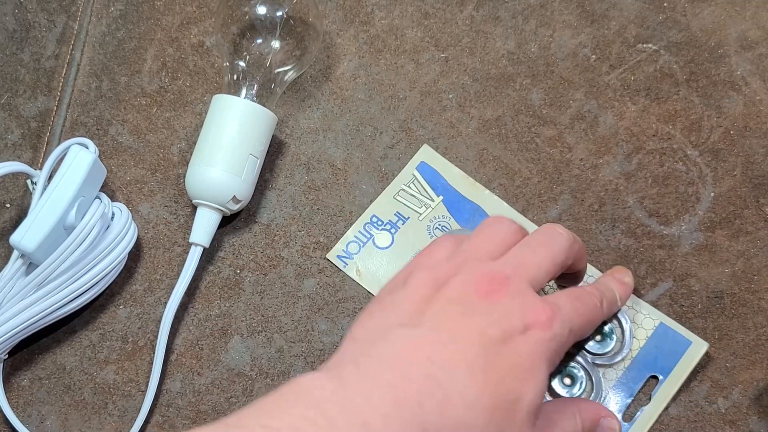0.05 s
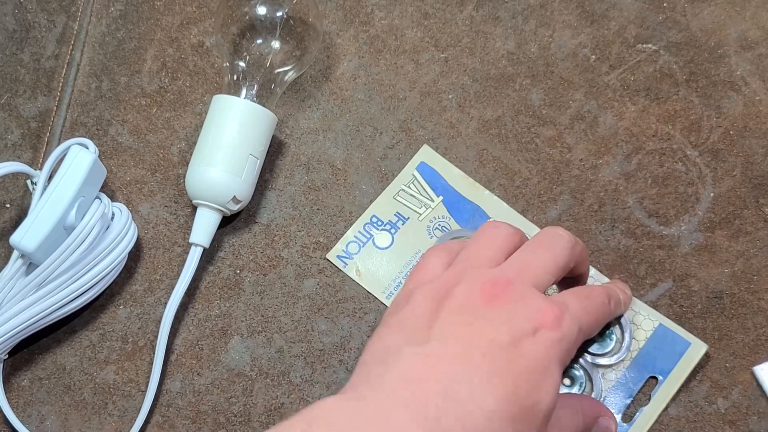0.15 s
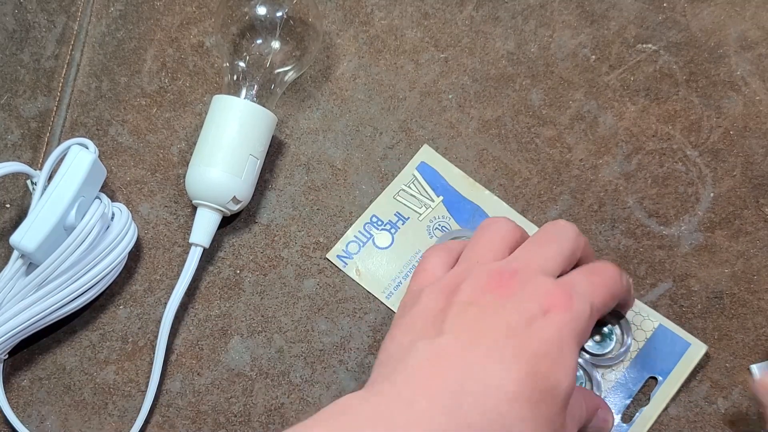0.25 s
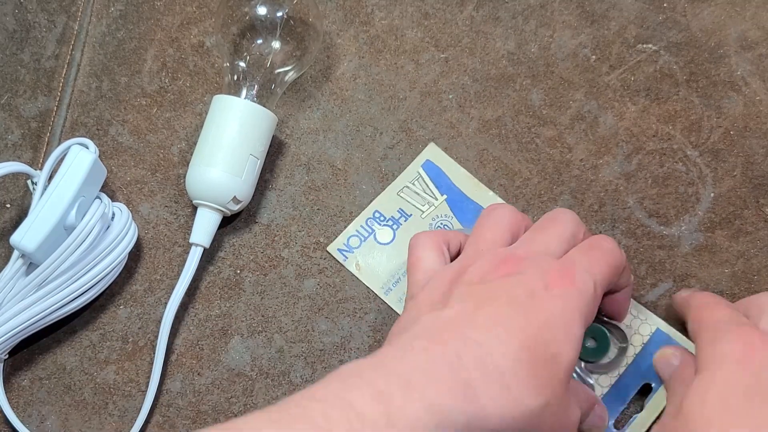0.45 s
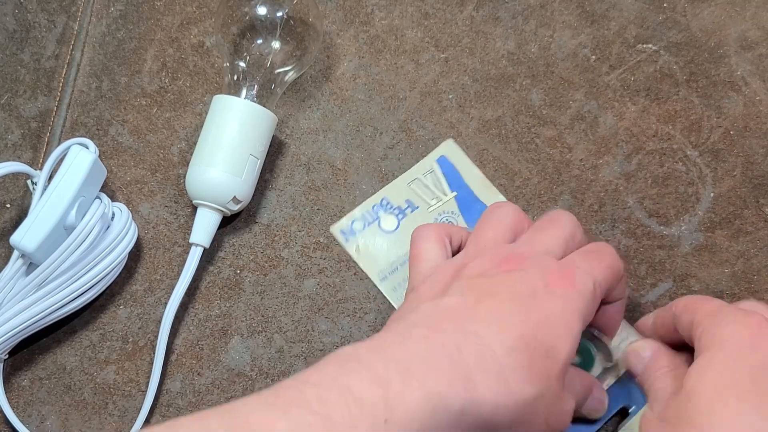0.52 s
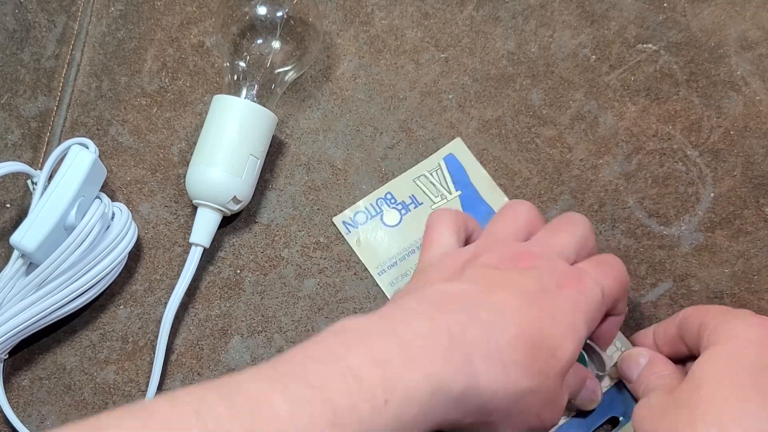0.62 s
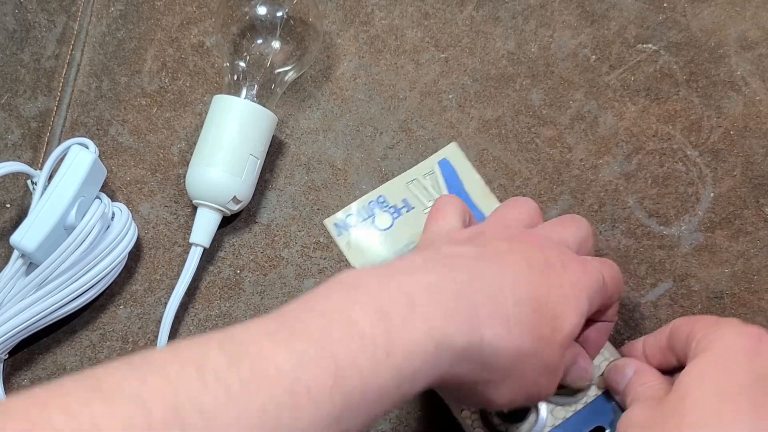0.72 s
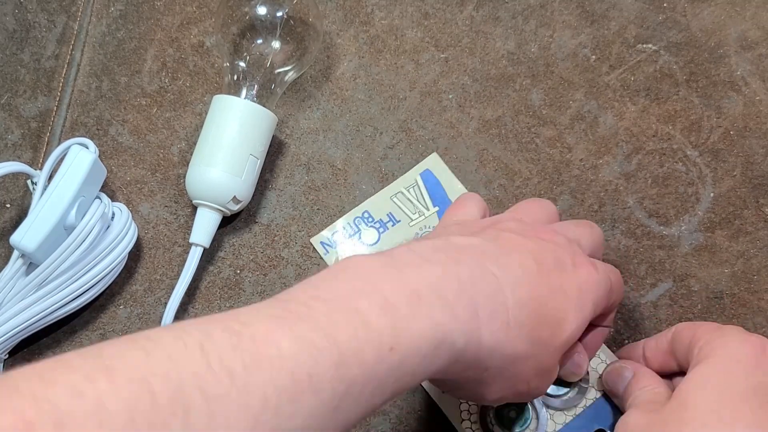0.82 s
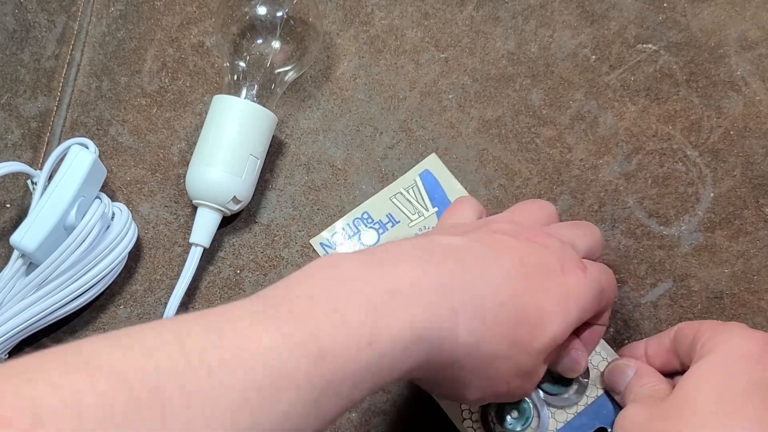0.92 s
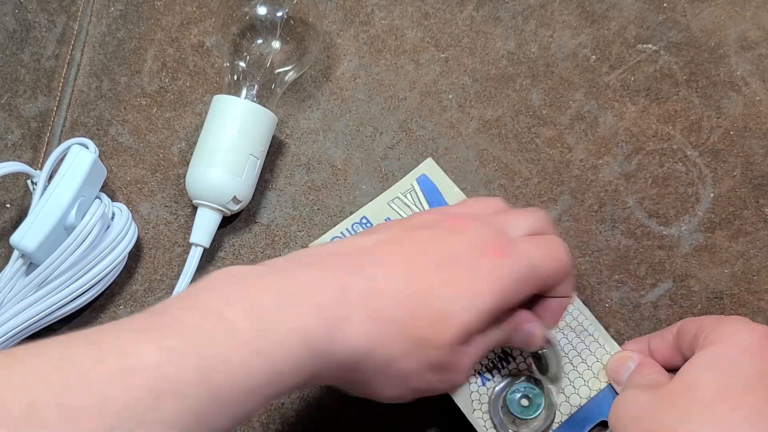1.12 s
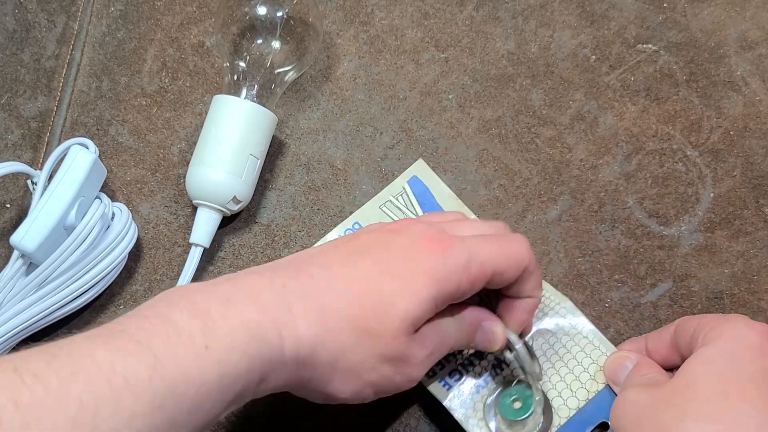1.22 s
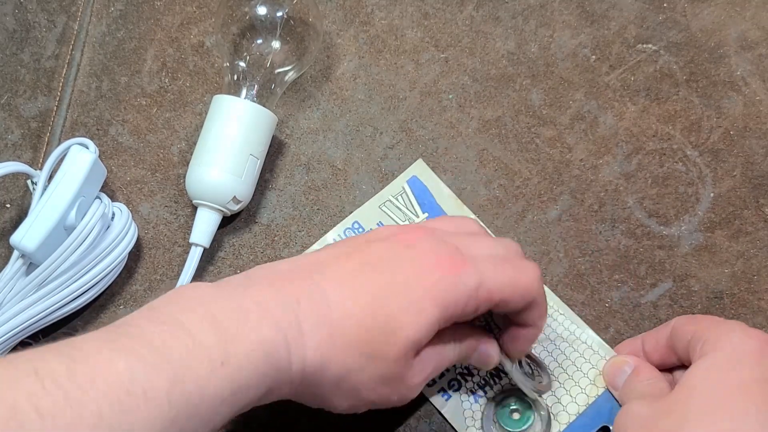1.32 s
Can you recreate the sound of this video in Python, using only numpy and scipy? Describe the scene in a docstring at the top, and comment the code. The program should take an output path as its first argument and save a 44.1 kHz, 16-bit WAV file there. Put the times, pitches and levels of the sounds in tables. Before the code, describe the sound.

Plastic blister packaging knocks on a tabletop, rustles under fingers and snaps open.

```python
"""Blister pack on a table

Close to a stereo microphone, in a small room with a low mains hum, a plastic blister pack is pressed onto
a table: the shell clacks, the pack flexes and the tabletop thumps. Fingers slide over it with a fine
hiss, the card rustles under the hands, and the blister ticks and snaps as it is bent open."""
import sys
import numpy as np
from scipy import signal
from scipy.fft import rfft, irfft
from scipy.io import wavfile

SR = 44100
rng = np.random.default_rng(int(sys.argv[2]) if len(sys.argv) > 2 else 0)


def log_audio(samples):
    """Write samples as a 16-bit WAV file to the path given in sys.argv[1]."""
    # one column per channel
    frames = np.atleast_2d(samples).T
    # limit to full scale, then quantise
    limited = np.clip(frames, -1, 1)
    pcm = np.round(limited * 32767).astype(np.int16)
    wavfile.write(sys.argv[1], SR, pcm)


N = 59535
BURST_T = np.arange(8192) / SR
BURST_HZ = np.fft.rfftfreq(8192, 1 / SR)

# The plastic's ring after a clack or crackle. Each row: frequency in Hz, relative level in dB, T60 in s.
PACK_MODES = [(1092, -1, 0.078), (1713, 2.5, 0.057), (1863, 0, 0.047), (2110, 3, 0.083), (3298, 4.5, 0.095),
              (4165, 1.5, 0.13), (4240, -2.5, 0.038), (4560, -9, 0.06), (4870, -20, .09),
              (6290, 6.5, 0.027), (7400, 3.5, 0.039), (12400, -5, 0.16)]


def amp(db):
    """Decibels to gain."""
    return 10 ** (np.asarray(db) / 20)


def unit(x):
    """Scales to rms 1."""
    return x / np.sqrt(np.mean(x ** 2) + 1e-20)


def curve_at(points, hz):
    """Reads a table on a log-frequency axis."""
    freqs, values = np.transpose(points)
    return np.interp(np.log(hz + 1), np.log(freqs + 1), values)


def pan(db):
    """Left and right gains for a level difference; positive is to the left."""
    return amp(np.array([[db], [-db]]) / 2)


def add(mix, start_s, sound):
    """Mixes a sound into both channels from start_s on."""
    part = mix[:, round(start_s * SR):][:, :sound.shape[1]]
    part += sound[:, :part.shape[1]]


def stereo(three, alike):
    """Two channels from one shared and two separate signals; alike is the shared part of the power."""
    return np.sqrt(alike) * three[:1] + np.sqrt(1 - alike) * three[1:]


def shaped(x, colour):
    """Gives a steady sound its spectrum, at rms 1."""
    gain = amp(curve_at(colour, np.fft.rfftfreq(N, 1 / SR)))
    return unit(irfft(rfft(x) * gain, N))


def burst(decay_s, colour_db, alike=0.65, rise_s=0.00036):
    """A short dying burst of coloured noise, as it reaches the two microphone ports."""
    # Phase between the ports. Each row: frequency in Hz, lead of the left port in radians.
    port_phase = [(200, 0), (600, -1.26), (1200, -1.6), (2100, -1.5), (3200, -0.5), (4500, -0.5),
                  (8000, -1.37), (16000, -1.8)]
    fade = (1 - np.exp(-BURST_T / rise_s)) * np.exp(-BURST_T / decay_s)
    spectrum = rfft(stereo(rng.standard_normal((3, len(BURST_T))), alike) * fade)
    for _ in range(3):  # even out the spectrum while keeping the fade
        white = unit(irfft(spectrum / (abs(spectrum) + 1e-12)))
        spectrum = rfft(np.tanh(white / (unit(fade) + 1e-6)) * fade)
    spectrum /= np.sqrt(np.mean(abs(spectrum) ** 2))
    log_gain = np.log(amp(np.r_[colour_db, colour_db[-2:0:-1]]))
    colour = np.exp(np.conj(signal.hilbert(log_gain)))[:len(BURST_HZ)]  # minimum phase: a sharp onset
    ports = np.exp(1j * curve_at(port_phase, BURST_HZ) * np.array([[1], [0]]))
    return irfft(spectrum * colour * ports)[:, :len(BURST_T) // 2]


def decay(t, t60):
    """A fade that falls 60 dB in t60 seconds."""
    return np.exp(-np.log(1000) * t / t60)


def ring(x, modes):
    """The dying modes that x sets going."""
    t = np.arange(SR // 2) / SR
    tone = sum(amp(db) * decay(t, t60) * np.cos(2 * np.pi * hz * t) for hz, db, t60 in modes)
    return signal.fftconvolve(x, tone[None], axes=1)[:, :N]


def room(x, alike, early_db=1, early_decay_s=0.011, delay_s=0.0012):
    """Dense early reflections from the table and hands, then the small room's short tail."""
    # The room's reverberation. Each row: frequency in Hz, T60 in seconds.
    room_t60 = [(150, 0.26), (500, 0.33), (1400, 0.26), (4000, 0.24), (12000, 0.15)]
    t = np.arange(SR // 2) / SR
    early_lift = 1 + amp(early_db) * np.exp(-t / early_decay_s)
    reflections = stereo(rng.standard_normal((3, len(t))), alike) * early_lift
    hz, frame_s, spectra = signal.stft(reflections, SR, nperseg=256)
    spectra *= decay(frame_s, curve_at(room_t60, hz)[:, None])
    tail = signal.istft(spectra, SR, nperseg=256)[1][:, :len(t)]
    tail *= np.clip(t / delay_s - 1, 0, 1)
    return signal.fftconvolve(x, tail / np.linalg.norm(tail[0]), axes=1)[:, :N]


def room_tone(waver_depth=0.37):
    """Wavering mains hum over the low rumble of the room, a little to the right."""
    # The hum's tones. Each row: frequency in Hz, level in dB.
    hum_tones = [(59.2, -59.5), (119.5, -54), (285.3, -66.5), (624.5, -70), (791.3, -72.5)]
    # The rumble's spectrum. Each row: frequency in Hz, relative level in dB.
    rumble_colour = [(20, -5), (55, -6.5), (100, 1.5), (160, -8.5), (300, -14), (600, -20.5), (1100, -27.5),
                     (2500, -35), (6000, -48), (16000, -46)]
    t, hum = np.arange(N) / SR, np.zeros(N)
    for hz, db in hum_tones:
        waver = unit(sum(np.sin(2 * np.pi * (f * t + rng.random())) for f in np.geomspace(1, 9, 10)))
        tone = np.sqrt(2) * np.sin(2 * np.pi * (hz * t + rng.random()))
        hum += amp(db) * (1 + waver_depth * waver) * tone
    rumble = shaped(stereo(rng.standard_normal((3, N)), alike=0.98), rumble_colour)
    return pan(-2.5) * hum + pan(-4) * amp(-50) * rumble


def hand_bumps(length_s=0.042):
    """Soft low swells as the hands press on the table."""
    # Each row: time of the peak in seconds, level in dB, pitch in Hz.
    presses = [(0.25, -36.5, 96), (0.468, -43.5, 80), (1.255, -44, 94), (1.331, -46, 96)]
    out, t = np.zeros((2, N)), np.arange(0, length_s, 1 / SR)
    for peak_s, db, hz in presses:
        swell = np.sin(np.pi * t / length_s) ** 2 * np.sin(2 * np.pi * (hz * t + rng.random()))
        add(out, peak_s - length_s / 2, pan(-5) * amp(db) * swell)
    return out


def friction(levels, colour, slips_per_s=5000, spread_db=2):
    """Rubbing: a dense stream of tiny slips under a level curve."""
    slips = rng.standard_normal((3, N)) * (rng.random((3, N)) < slips_per_s / SR)
    slips *= amp(spread_db * np.minimum(rng.exponential(1, (3, N)), 4))
    level_db = np.interp(np.arange(N) / SR, *np.transpose(levels))
    return shaped(stereo(slips, alike=0.27), colour) * amp(level_db)


def palm_brush():
    """The palm brushes the card with a low, dull rub."""
    # The rub's course. Each row: time in seconds, level in dB.
    levels = [(0, -55.5), (.1, -59), (.15, -56.5), (.2, -58), (.45, -85), (.7, -71), (.8, -64.5),
              (1.0, -74), (1.15, -62.5), (1.35, -59)]
    # Its spectrum. Each row: frequency in Hz, relative level in dB.
    colour = [(30, -17), (100, -12), (220, -4), (400, 8), (700, -8), (1200, -3.5), (3000, -24),
              (16000, -54)]
    return friction(levels, colour)


def card_rustle():
    """The card rustles in brief midrange swells."""
    # The rustle's course. Each row: time in seconds, level in dB.
    levels = [(0, -52.5), (.08, -70), (.14, -58), (.17, -109), (.195, -44), (.4, -69), (.52, -81),
              (.59, -54), (.66, -77), (1.04, -72), (1.11, -57), (1.19, -62), (1.25, -55), (1.35, -59)]
    # Its spectrum. Each row: frequency in Hz, relative level in dB.
    colour = [(200, -19), (800, -5), (1500, -4), (2300, -9), (3200, -11), (5000, -16.5), (9000, -36),
              (16000, -35)]
    return friction(levels, colour)


def finger_slide():
    """Fingers slide on the pack with a fine hiss, left of centre."""
    # The hiss's course. Each row: time in seconds, level in dB.
    levels = [(0, -53), (.13, -52), (.2, -50), (.36, -51.5), (.52, -57), (.59, -50), (.66, -55.5),
              (.8, -56), (.87, -53.5), (.93, -60.5), (1.02, -62.5), (1.2, -68.5), (1.28, -66), (1.35, -78)]
    # Its spectrum. Each row: frequency in Hz, relative level in dB.
    colour = [(200, -30), (1500, -21.5), (3000, -8), (4400, -10), (5150, -5.5), (5900, -8.5), (7800, -1.5),
              (10000, -6.5), (12000, -1), (13000, -2), (14400, 2), (16000, -7)]
    return pan(6) * friction(levels, colour)


def blister_crackles(resonance_octaves=0.11, grip_t60_ratio=0.55):
    """Each buckle of the blister is a burst with one resonance; the gripping fingers shorten its ring."""
    # Each row: start in seconds, levels in dB at 350 Hz, 1.6 kHz, 5 kHz, 7.8 kHz and from 11 kHz up,
    # resonance in Hz, its lift in dB, decay in seconds, left over right in dB.
    buckles = [(0.4152, -37, -46, -20.5, -22, -6, 14900, 2, 0.00081, 0),
               (0.8775, -33, -12.5, -26.5, -22, -13, 6130, 16, 0.0016, 2.5),
               (0.8817, -23, -20.5, -27, -25, -33, 1990, 12, 0.00039, -2),
               (1.0515, -8, -6, -18.5, -15, -19, 1120, 9, 0.0011, -2),
               (1.0533, -8, -4, -4, -3, -9.5, 4550, 12, 0.0011, 5),
               (1.0596, -19, -14, -13.5, -19, -19, 3900, 9, 0.0011, -15.5),
               (1.1018, -28, -14, -27, -33, -41, 3000, 8, 0.00048, 1),
               (1.1661, -25, -11.5, -38.5, -38, -47, 1220, 11, 0.0015, 0.5),
               (1.2279, -29, -10.5, -23, -29, -32, 2910, 9, 0.00089, 1),
               (1.2505, -15, -41, -28, -26, -30, 3240, 5, 0.0024, 4),
               (1.2934, -19, -15.5, -17, -24, -4, 2980, 11, 0.00065, 4.5)]
    snaps = np.zeros((2, N))
    for start_s, low_db, mid_db, bright_db, crisp_db, top_db, hz, lift_db, decay_s, pan_db in buckles:
        bands = [(40, low_db - 20), (350, low_db), (1600, mid_db),
                 (5000, bright_db), (7800, crisp_db), (11000, top_db)]
        octaves_off = np.log2((BURST_HZ + 1) / hz)
        resonance_db = lift_db * np.exp(-0.5 * (octaves_off / resonance_octaves) ** 2)
        add(snaps, start_s, pan(pan_db) * burst(decay_s, curve_at(bands, BURST_HZ) + resonance_db))
    held_modes = [(hz, db, t60 * grip_t60_ratio) for hz, db, t60 in PACK_MODES]
    return snaps + amp(-43.5) * ring(snaps, held_modes) + amp(-10) * room(snaps, alike=0.2)


def table_knocks(flex_t60_s=0.069):
    """Soft blows thud, flex the pack at a pitch set by the grip, and ring the table's low modes."""
    # The pack meets the table. Each row: start in seconds, blow level in dB, contact cutoff in Hz,
    # flex pitch in Hz, flex level in dB.
    knocks = [(0.2021, 9, 1000, 530, -29), (0.2191, 16, 900, 548, -17), (0.2351, 6, 504, 409, -29),
              (0.25, 3, 398, 387.5, -33), (0.3084, 8, 1100, 299, -22.5), (0.3250, 3, 252, 383, -36)]
    # The table's ring. Each row: frequency in Hz, relative level in dB, T60 in seconds.
    table_modes = [(123, -22, 0.12), (186.3, -16.5, 0.26), (231, -13, 0.3), (299, -5.5, 0.1),
                   (392.7, -8, 0.15), (431.4, -5.5, 0.12), (536, -15, 0.12), (978, -13, 0.15),
                   (618, -10.5, 0.12)]
    # The thud's spectrum. Each row: frequency in Hz, relative level in dB.
    thud_colour = [(25, -39), (60, -36), (130, -11), (290, -0.5), (520, -3.5), (800, -10.5), (1500, -13),
                   (4000, -28), (16000, -42)]
    thuds, blows, flexes = np.zeros((3, 2, N))
    for start_s, db, cutoff_hz, flex_hz, flex_db in knocks:
        treble_loss_db = 10 * np.log10(1 + (BURST_HZ / cutoff_hz) ** 4)
        colour_db = db + curve_at(thud_colour, BURST_HZ) - treble_loss_db
        add(thuds, start_s, burst(decay_s=0.004, colour_db=colour_db, alike=0.9956))
        push = BURST_T * np.exp(-2 * np.pi * cutoff_hz * BURST_T)
        add(blows, start_s, -amp(db) * push[None] / push.sum())
        flex = decay(BURST_T, flex_t60_s) * np.sin(2 * np.pi * flex_hz * BURST_T)
        add(flexes, start_s, -amp(flex_db) * flex[None])
    direct = thuds + flexes + amp(-38) * ring(blows, table_modes)
    return pan(-5) * (direct + amp(3) * room(thuds, alike=0.94))


def shell_clacks():
    """The stiff shell and its discs rattle as the pack lands, and the plastic rings on."""
    # Each row: start in seconds, level in dB, treble tilt in dB per octave, decay in seconds.
    hits = [(0.2050, 7.5, -2, 0.0022), (0.2087, -1, 2.5, 0.0024), (0.219, 9, -0.5, 0.0035),
            (0.2223, 13, -1, 0.0012), (0.2254, 10.5, -0.5, 0.0034), (0.2345, -30, -12.5, .002),
            (0.2359, -18, -4, .002), (0.3090, -6, -0.5, 0.00215)]
    # The shell's spectrum. Each row: frequency in Hz, relative level in dB.
    shell_colour = [(100, -29), (600, -10), (1200, -6.5), (1780, -1), (2700, -10), (4200, -0.5), (6400, -2),
                    (9500, -6), (12000, -1.5), (16000, -7.5)]
    clacks = np.zeros((2, N))
    octaves = np.log2((BURST_HZ + 100) / 4000)
    for start_s, db, tilt, decay_s in hits:
        add(clacks, start_s, burst(decay_s, db + curve_at(shell_colour, BURST_HZ) + tilt * octaves))
    return pan(1) * (clacks + amp(-45.5) * ring(clacks, PACK_MODES) + amp(-3.5) * room(clacks, alike=0.35))


def scene():
    """The pack and the hands close up, the room behind."""
    rubbing = finger_slide() + card_rustle() + palm_brush()
    pack = table_knocks() + shell_clacks() + blister_crackles()
    return pack + rubbing + hand_bumps() + room_tone()


def record(dry):
    """The recorder rounds off the highest peaks and cuts the treble above 15.9 kHz."""
    rounded = dry / (1 + dry ** 4) ** (1 / 4)
    lowpass = signal.firwin(511, 15900, window=("kaiser", 9), fs=SR)
    return signal.oaconvolve(rounded, lowpass[None], "same")


dry = scene()
out = record(dry)
log_audio(out)
```